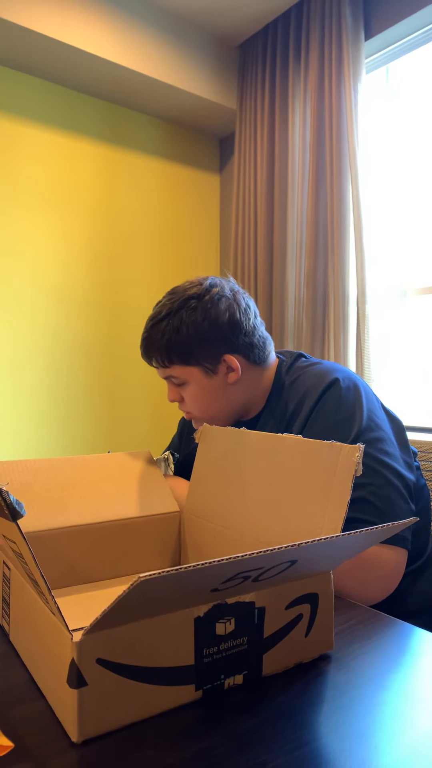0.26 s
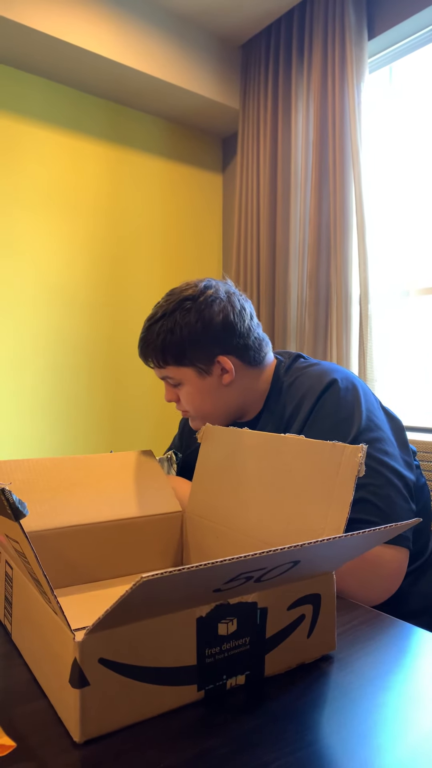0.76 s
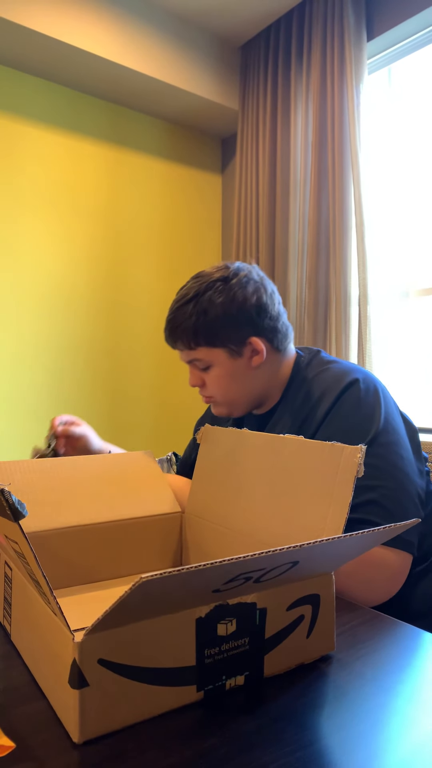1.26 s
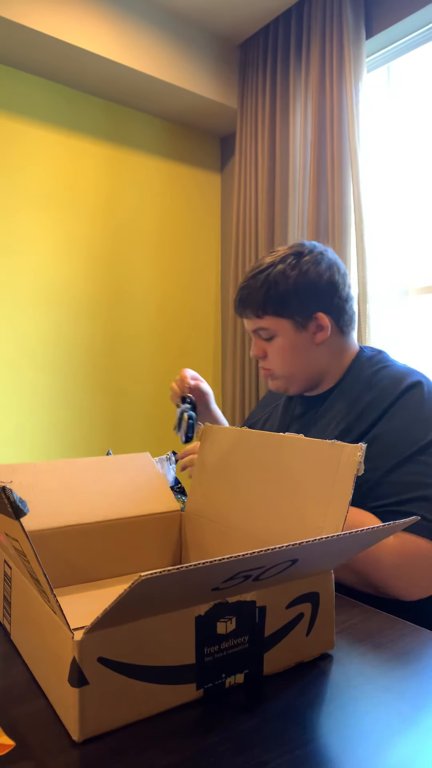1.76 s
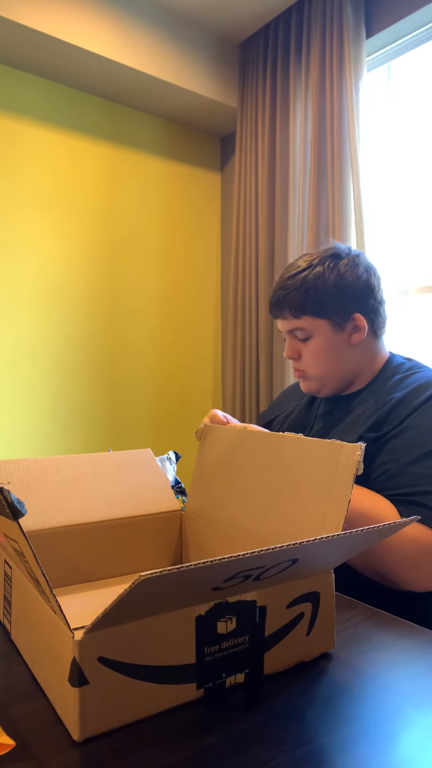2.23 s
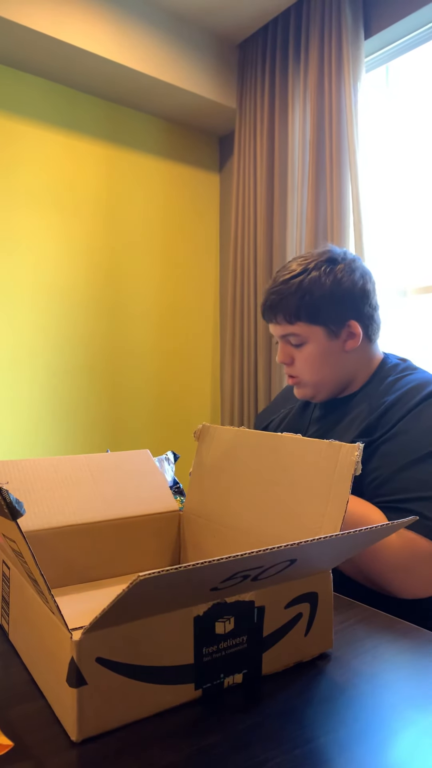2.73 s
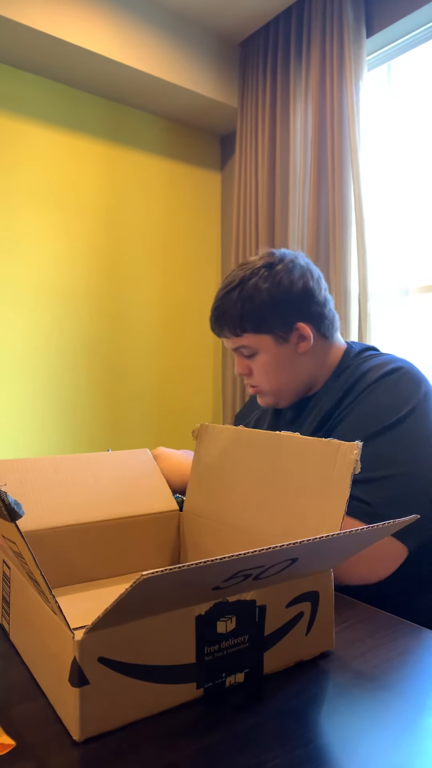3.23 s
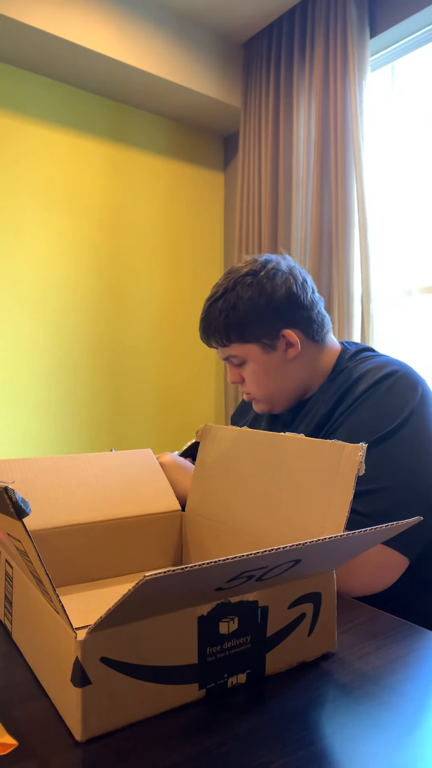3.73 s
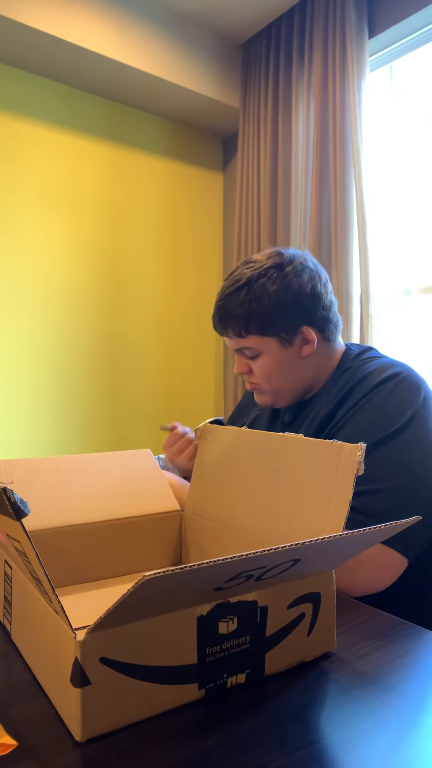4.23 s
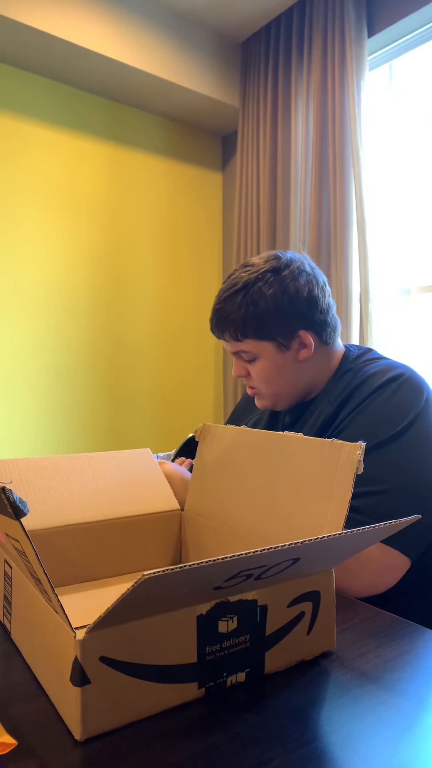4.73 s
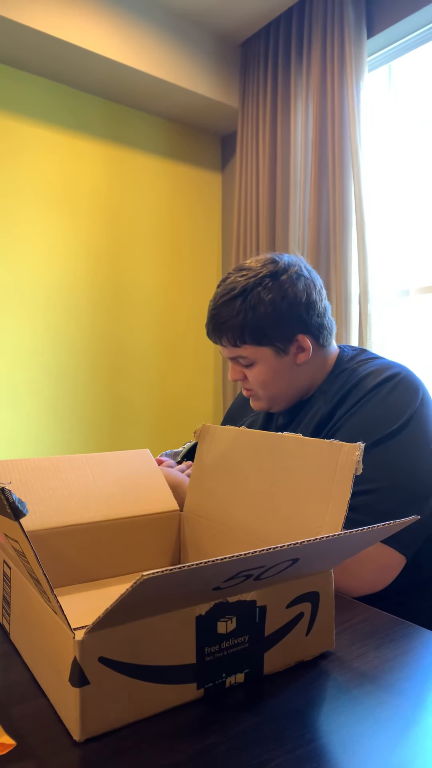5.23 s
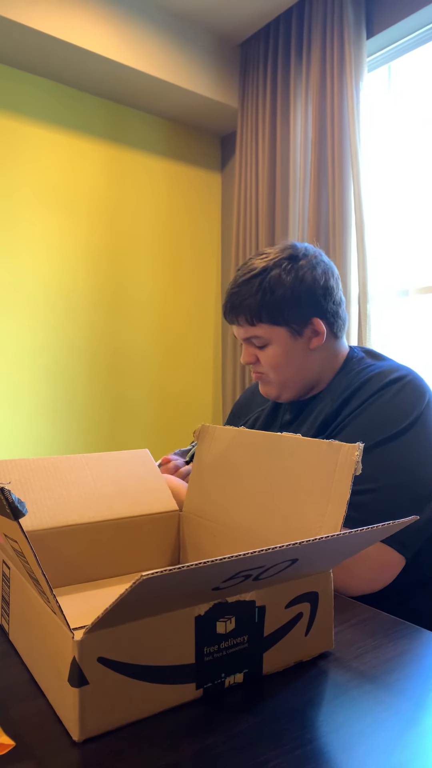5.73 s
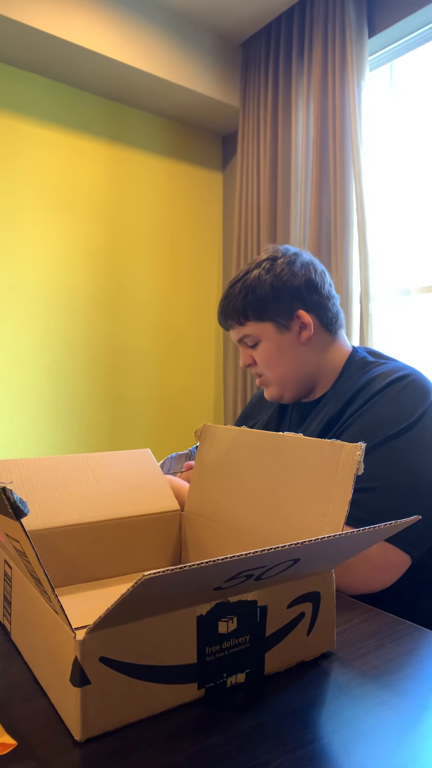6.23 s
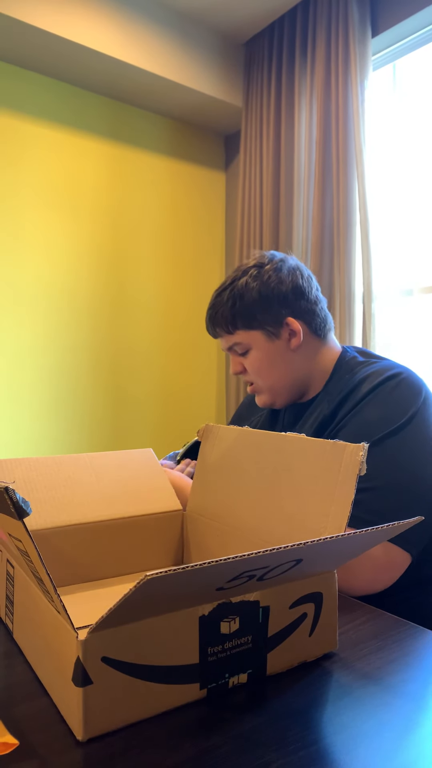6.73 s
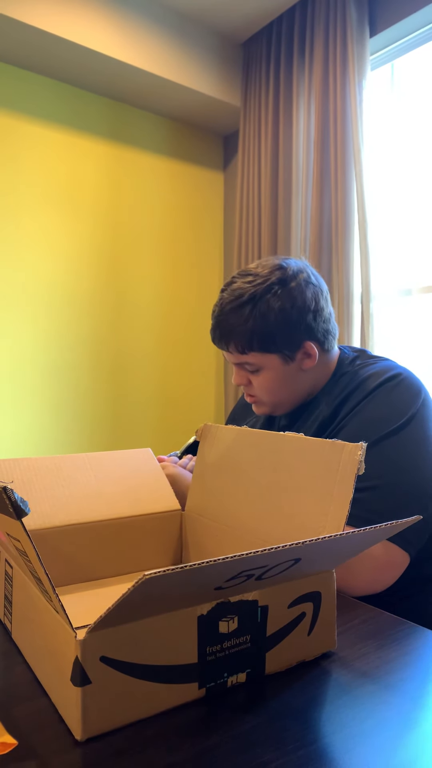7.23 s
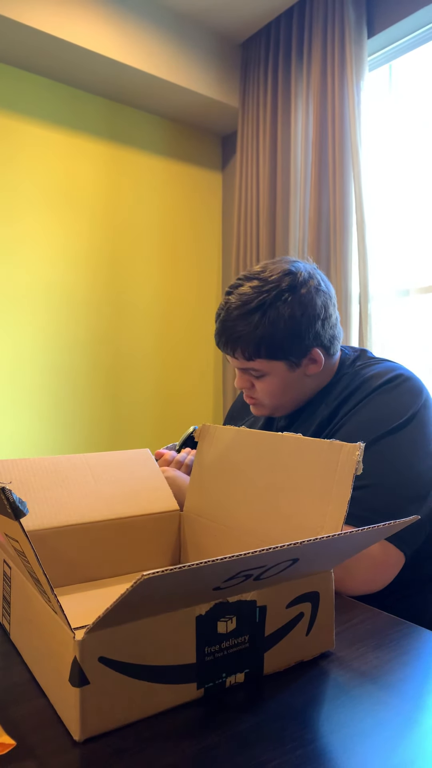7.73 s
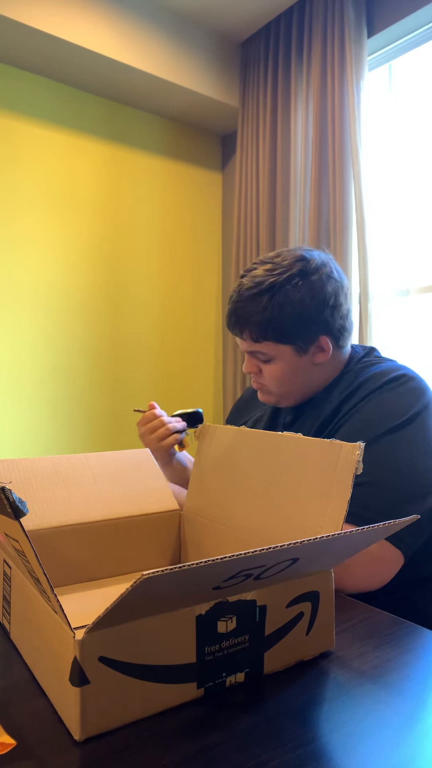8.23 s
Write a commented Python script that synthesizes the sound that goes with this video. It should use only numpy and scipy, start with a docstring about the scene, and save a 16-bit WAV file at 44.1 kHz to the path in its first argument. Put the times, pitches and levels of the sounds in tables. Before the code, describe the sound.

Close on a tabletop in a bare, echoing room, foil bags are gripped and shifted behind a cardboard box. Quiet rustles and tiny snaps come first, with a thin metallic ping and short scrapes. From about four seconds the crinkling grows fuller and solid knocks hit the table, the heaviest near the end. Faint air noise lies underneath.

```python
"""Foil snack bags crinkle as they are gripped and shifted behind a cardboard box on a table.
Many random tiny buckles make the rustle, and single creases snap. Things knock and bump on the tabletop,
and a small metal object scrapes and pings. The room is bare and echoing, with faint air noise.
The microphone stands on the same table, so each knock reaches it first through the board."""
import sys
import numpy as np
from scipy import signal
from scipy.fft import rfft, irfft, next_fast_len
from scipy.io import wavfile
from scipy.ndimage import uniform_filter1d

SR = 44100
rng = np.random.default_rng(int(sys.argv[2]) if len(sys.argv) > 2 else 0)


def to_wav(sig):
    """Store sig (one row per channel, or 1-D mono) as 16-bit WAV at the path in sys.argv[1].

    Samples outside -1..1 are clipped; the rate is SR.
    """
    pcm = np.clip(np.atleast_2d(sig), -1, 1) * 32767
    pcm = np.round(pcm).astype(np.int16)
    wavfile.write(sys.argv[1], SR, pcm.T)  # frames by channels


N = 373525

# All levels in the tables are relative: each source adds its own gain.
# faint air noise, spectrum: pitch_hz, level_db
AIR_SPECTRUM = [(30, -0.5), (130, 0), (300, -8), (1000, -7), (2000, -11), (4000, -6.5), (8000, -23),
                (15000, -49)]
# how long the room echoes: pitch_hz, t60_s (time to fade by 60 dB)
ROOM_ECHO = [(100, 0.87), (400, 0.78), (1500, 1.0), (4000, 0.97), (8000, 0.52), (13000, 0.25)]

# the metal is struck: start_s, level_db
PINGS = [(0.34, -36.5)]
# ways the metal rings: pitch_hz, level_db, t60_s
METAL_MODES = [(6050, -19, 1.1), (7424, -26, .5), (9038, -19, .55), (11262, -6, .4), (11332, -12, .4),
               (13426, -10, .4), (15385, 3, .25)]

# metal dragged over the table: start_s, length_s, drone_db, low_whistle_db, high_whistle_db
DRAGS = [(0.21, 0.19, -49.5, -58, -58), (0.87, 0.31, -45, -62, -64.5), (1.08, .12, -43, -53.5, -46),
         (2.05, 0.025, -71, -72, -60), (2.15, 0.062, -72, -62, -48.5), (2.27, 0.032, -67, -54.5, -62),
         (2.4, 0.14, -79, -66, -88), (2.61, 0.22, -90, -65.5, -82)]
# how fast a drag dies away: drone, low whistle, high whistle (dB per s each)
DRAG_RELEASE = [88, 51, 230]
DRAG_ATTACK_S = 0.025
# resonances that dragging excites: pitch_hz, width_hz, level_db
DRONE_MODES = [(453, 32, 11), (623, 28, -1.5), (767, 58, 2.5), (910, 95, 1)]
# same columns: pitch_hz, width_hz, level_db
LOW_WHISTLE_MODES = [(3175, 79, -1.5), (3400, 140, -4), (3730, 290, -29), (4700, 1900, -16)]
# same columns: pitch_hz, width_hz, level_db
HIGH_WHISTLE_MODES = [(7980, 110, -6), (9480, 130, -6), (12200, 100, 4.5), (13700, 80, -14),
                      (14120, 120, -4)]

# soft bumps on the table: start_s, level_db
BUMPS = [(1.06, -46.5), (1.784, -51), (1.878, -52), (2.412, -56.5), (3.174, -47.5), (3.272, -52),
         (3.382, -46.5), (3.881, -45.5), (4.464, -48.5), (5.313, -39.5), (5.779, -34.5), (6.87, -52),
         (7.864, -33.5), (7.999, -33)]
# boom of a bump, spectrum: pitch_hz, level_db
BUMP_SPECTRUM = [(20, 3), (50, -7.5), (130, 8.5), (200, 3.5), (400, -2), (1500, -82)]

# blows on the table: start_s, level_db, pitch_hz (of the struck thing), crack_db (added to level_db)
KNOCKS = [(0.116, -37.5, 950, -8), (0.740, -29.5, 1340, -7), (1.845, -40, 1616, 1), (2.999, -35, 1500, -19),
          (4.008, -22, 730, -9), (4.043, -15.5, 680, -21), (4.921, -27, 837, -15), (5.308, -14, 1030, -11),
          (5.582, -23, 580, -22), (5.774, -11.5, 710, -11), (6.333, -26.5, 476, -8.5),
          (6.794, -27.5, 473, -13), (7.853, -6.5, 366, -18.5), (7.896, -16.5, 377, -13)]
# body of a blow, spectrum: pitch_hz, level_db
KNOCK_SPECTRUM = [(25, -24), (60, -50), (130, -0.5), (200, -15), (260, 2), (420, 2.5), (650, 3), (1100, 0),
                  (1700, -0.5), (2500, -8), (5000, -15.5), (15000, -25)]
# sharp crack of a blow, spectrum: pitch_hz, level_db
CRACK_SPECTRUM = [(500, -47), (2000, 21), (4000, 18.5), (7500, 10), (9000, -7), (15800, -4)]
KNOCK_RING_DB = 11  # how far the pitch stands out
KNOCK_ROOM_DB, CRACK_ROOM_DB = 7, 7  # echo level against the near sound

# the loudest creases that snap: start_s, level_db, pitch_hz (of the facet), bright_db
SNAPS = [(0.1195, -32, 3340, -32), (0.217, -27.5, 4670, -18), (0.3431, -23, 4140, -3),
         (0.3507, -23.5, 3500, -13.5), (0.7497, -29.5, 2550, -23), (1.091, -38, 3220, 6),
         (1.473, -28.5, 1980, -15), (1.847, -29, 4600, -31.5), (1.96, -30.5, 2210, -38),
         (2.107, -31, 2490, -19), (2.495, -51, 4300, -20), (2.628, -52, 4800, -3),
         (2.821, -30.5, 7350, -16.5), (3.001, -36.5, 2980, -41), (3.356, -27, 6560, -15),
         (3.386, -24, 8300, -7), (3.6393, -31.5, 7200, -11), (3.686, -22, 7900, -15.5),
         (3.8606, -24.5, 4320, -10), (3.8899, -18, 5800, -8.5), (4.0751, -18.5, 1980, -22),
         (5.019, -35, 9000, -11), (5.08, -33, 2560, -21), (5.14, -37, 3300, -13), (5.3928, -21, 2190, -20),
         (5.437, -23, 4490, -15), (5.4587, -19, 2400, -23.5), (5.5853, -21.5, 3900, -21.5),
         (5.8152, -15, 4400, -15), (5.8365, -17, 3400, -4), (6.0877, -25.5, 2110, -7),
         (6.1732, -21, 2660, -28), (6.4058, -26.5, 2200, -15), (6.5298, -25, 5300, -21),
         (6.9395, -27.5, 3350, -17), (7.0107, -32, 2000, -7), (7.1133, -23.5, 3560, -19),
         (7.2126, -25.5, 5450, -1), (7.3019, -21, 2480, -18), (7.4208, -26.5, 4160, -41),
         (7.4691, -27.5, 2050, -29), (7.8113, -25, 4880, -27.5), (7.86, -10, 2420, -12.5),
         (8.055, -21, 2750, -11), (8.2791, -20.5, 2280, -24)]
# sound of a snap, spectrum: pitch_hz, level_db
SNAP_SPECTRUM = [(60, -40), (300, -13.5), (600, -3.5), (1200, -2), (3000, -0.5), (6000, 1.5), (7900, 1.5),
                 (8600, -1.5), (15800, -4.5)]
FACET_RING_DB, SNAP_ROOM_DB = 6, 1  # how far the pitch stands out; echo level against the near sound
GIVE_WAY_S = 0.004  # how quickly slips get smaller away from the main one

# a hand grips and shifts a bag: start_s, length_s, slide_db, crinkle_db, finest_creases_db
GRIPS = [(-0.1, 0.14, -44.5, -47.5, -66), (0.15, .05, -52, -52, -74), (0.2, 0.26, -44, -56, -57),
         (0.67, 0.074, -55, -53, -67), (0.74, 0.1, -45.5, -50, -76), (1.0, 0.35, -44, -46.5, -56),
         (1.46, 0.21, -46, -49.5, -59.5), (1.84, .14, -63, -56.5, -88), (2.09, 0.19, -53, -53, -63.5),
         (2.61, 0.046, -87, -73, -69), (2.88, 0.055, -76, -64, -67), (3.16, 0.2, -52, -53, -68.5),
         (3.35, 0.265, -48, -51.5, -70), (3.62, 0.11, -43.5, -46, -51.5), (3.76, 0.23, -37, -46, -58),
         (4.04, 0.075, -33.5, -37.5, -48), (4.27, .2, -45.5, -46.5, -65), (4.46, 0.072, -35, -36.5, -50.5),
         (4.6, 0.3, -45, -42.5, -58.5), (4.96, 0.11, -48.5, -53, -76), (5.13, 0.21, -48, -50, -73),
         (5.35, 0.15, -39.5, -44, -54), (5.79, .09, -29, -41.5, -50), (5.93, 0.103, -38.5, -41.5, -66),
         (6.15, 0.28, -39.5, -41, -55.5), (6.52, 0.23, -41.5, -44.5, -57.5), (6.74, 0.054, -40.5, -44, -67),
         (6.92, 0.44, -47, -45.5, -57.5), (7.42, .1, -43, -43, -57.5), (7.6, .2, -52.5, -54.5, -72),
         (7.86, .22, -27.5, -29, -41), (8.15, .16, -35, -41.5, -51)]
# how fast a grip dies away: sliding, crinkle, finest creases (dB per s each)
GRIP_RELEASE = [47.2, 51.4, 170]
GRIP_ATTACK_S = 0.03
# bag sliding on the table, spectrum: pitch_hz, level_db
SLIDE_SPECTRUM = [(25, -73), (60, -22.5), (125, -7), (190, -8), (260, -1.5), (370, 2), (520, 0.5),
                  (720, 1.5), (1050, 1), (1600, -4), (2500, -14.5), (5000, -31.5)]
# coarse crinkle of the foil, spectrum: pitch_hz, level_db
CRINKLE_SPECTRUM = [(600, -44), (1400, -4.5), (2300, 2), (4000, 0), (6000, -2.5), (7800, -6.5), (8600, -24),
                    (11000, -33), (16000, -68)]
# finest creases of the foil, spectrum: pitch_hz, level_db
CREASES_SPECTRUM = [(3000, -11), (6500, 0.5), (9000, 1.5), (12000, -4.5), (15800, -6.5)]

TOP_HZ = 15850  # the recorder's band limit


def amp(db):
    """Turn decibels into a gain."""
    return 10 ** (np.asarray(db) / 20)


def unit(x):
    """Scale to an average strength (rms) of 1."""
    return x / np.sqrt(np.mean(x ** 2) + 1e-20)


def along(points, hz):
    """Read values between (Hz, value) points, spaced by pitch on a log axis."""
    point_hz, values = np.transpose(points)
    return np.interp(np.log(hz + 1), np.log(point_hz), values)


def add(track, s, sound):
    """Mix a sound into the track at time s (seconds)."""
    start = int(np.clip(round(s * SR), 0, N - 1))
    track[start:start + len(sound)] += sound[:N - start]


def filtered(x, response):
    """Multiply the spectrum of x by a gain that depends on frequency."""
    padded = next_fast_len(N + 8192)
    hz = np.fft.rfftfreq(padded, 1 / SR)
    return irfft(rfft(x, padded) * response(hz), padded)[:N]


def click(spectrum, tilt_db=0, ring_hz=1000, ring_db=0, ring_octaves=1, size=2048):
    """A pulse of energy 1 with this spectrum, tilted by about tilt_db an octave, plus one resonance."""
    hz = np.fft.rfftfreq(size, 1 / SR)
    ring = ring_db / (1 + (np.log2((hz + 1) / ring_hz) / ring_octaves) ** 2)
    tilt = tilt_db * np.log2(1 + hz / 2000)
    # folding the cepstrum puts all the sound after the start of the pulse
    cepstrum = irfft(np.log(amp(along(spectrum, hz) + tilt + ring)))
    cepstrum[1:size // 2] *= 2
    cepstrum[size // 2 + 1:] = 0
    pulse = irfft(np.exp(rfft(cepstrum)))
    return pulse / np.linalg.norm(pulse)


def coloured(x, spectrum):
    """Give x this spectrum, at rms 1."""
    return unit(signal.fftconvolve(x, click(spectrum))[:N])


def movements(rows, attack_s, release_db_per_s, size=64):
    """Gain curves, one per level column: each movement sets in, holds for its length and dies away."""
    start, length, *levels = np.transpose(rows)[:, :, None]
    t = np.arange(0, N, size) / SR
    rise = np.clip((t - start) / attack_s, 0, 1)
    since_end = np.maximum(t - start - length, 0)
    gains = []
    for db, fall in zip(levels, release_db_per_s):
        shape = rise * amp(db - fall * since_end)
        together = np.linalg.norm(shape, axis=0)  # overlapping movements add in power
        gains.append(np.interp(np.arange(N) / SR, t, together))
    return gains


def room(wet_db, scatter_s, size=512):
    """A path to the microphone: a short scatter off the box, and the room's fading echo."""
    hz = np.fft.rfftfreq(size, 1 / SR)
    frame_s = np.arange(0, 0.7, size / 2 / SR)
    noise = rng.standard_normal((len(hz), len(frame_s), 2)) @ [1, 1j]
    fade = np.exp(-np.log(1000) * frame_s / along(ROOM_ECHO, hz)[:, None])
    tail = signal.istft(noise * fade)[1]
    t = np.arange(SR // 12) / SR
    tail[:len(t)] *= 1 - np.exp(-t / 0.0014)  # the echo takes a moment to build up
    near = rng.standard_normal(len(t)) * t * np.exp(-t / scatter_s)
    path = amp(wet_db) * tail / np.sqrt(np.sum(tail ** 2))
    path[:len(t)] += near / np.sqrt(np.sum(near ** 2))
    return path


def still_air():
    """Steady, faint noise shaped like the still air of the room."""
    return amp(-65.5) * coloured(rng.standard_normal(N), AIR_SPECTRUM)


def pings():
    """Struck metal rings in thin, high modes that build up in the room."""
    out, t = np.zeros(N), np.arange(SR) / SR
    build_up = 1 - np.exp(-t / 0.0041)
    for s, db in PINGS:
        for hz, mode_db, t60 in METAL_MODES:
            phase_drift = np.cumsum(rng.normal(0, 0.03, len(t)))
            fade = amp(db + mode_db - 60 * t / t60)
            tone = np.sin(2 * np.pi * hz * t + phase_drift)
            add(out, s, amp(5.0) * fade * build_up * tone)
    return out


def resonant(modes):
    """Friction noise of rms 1, heard through a set of resonances."""
    def response(f):
        return sum(amp(db) / (1 + ((f - hz) / (width / 2)) ** 2) ** 0.75 for hz, width, db in modes)
    return unit(filtered(rng.standard_normal(N), response))


def scrapes():
    """Dragged metal whistles in its own resonances, and the cardboard it rubs drones hollowly."""
    drone, low, high = movements(DRAGS, DRAG_ATTACK_S, DRAG_RELEASE)
    return (amp(0.5) * drone * resonant(DRONE_MODES)
            + amp(6.0) * low * resonant(LOW_WHISTLE_MODES)
            + high * resonant(HIGH_WHISTLE_MODES))


def bumps():
    """Soft contacts make the table boom quietly."""
    out = np.zeros(N)
    for s, db in BUMPS:
        boom = signal.fftconvolve(click(BUMP_SPECTRUM), room(wet_db=1.5, scatter_s=0.01))
        add(out, s, amp(db + 25.5) * boom)
    return out


def board_wave(travel_s, peak_hz, size=2048):
    """A bending wave of energy 1: high frequencies travel faster, so the pulse falls in pitch."""
    pitch_ratio = np.fft.rfftfreq(size, 1 / SR) / peak_hz
    delay_phase = 4 * np.pi * peak_hz * travel_s * np.sqrt(pitch_ratio)
    wave = irfft(pitch_ratio ** 2 * np.exp(-2 * pitch_ratio - 1j * delay_phase))
    return wave / np.linalg.norm(wave)


def knocks():
    """Each blow runs through the tabletop first, then arrives through the air and fills the room."""
    out = np.zeros(N)
    wave = board_wave(travel_s=0.0062, peak_hz=680)
    for s, db, ring_hz, crack_db in KNOCKS:
        # light taps hardly shake the board
        board_db = db + 15 + min(0, 0.6 * (db + 16))
        add(out, s - 0.0033, amp(board_db) * wave)
        pulse = click(KNOCK_SPECTRUM, 0, ring_hz, KNOCK_RING_DB, ring_octaves=0.43)
        body = signal.fftconvolve(pulse, room(KNOCK_ROOM_DB, scatter_s=0.0047))
        add(out, s + 0.001995, amp(db + 12.0) * body)
        crack = signal.fftconvolve(click(CRACK_SPECTRUM), room(CRACK_ROOM_DB, scatter_s=0.0045))
        add(out, s + 0.003, amp(db + crack_db + 15.0) * crack)
    return out


def cascade(spread_s, count=56):
    """A crease gives way in one main slip, with smaller ones just before and after it."""
    half = SR // 40
    out = np.zeros(2 * half + 1)
    offsets = rng.integers(-half, half, count)
    sizes = np.exp(-np.abs(offsets) / SR / max(spread_s, 1e-4))
    out[half + offsets] = rng.choice([-1, 1], count) * sizes
    out[half] = 1
    return out / np.linalg.norm(out)


def snaps():
    """Single creases flip and ring their facet; the sharper the fold, the brighter the snap."""
    out = np.zeros(N)
    for s, db, ring_hz, bright_db in SNAPS:
        tilt_db = 0.57 * (bright_db + 8.5)
        pulse = click(SNAP_SPECTRUM, tilt_db, ring_hz, FACET_RING_DB, ring_octaves=0.22)
        slips = cascade(GIVE_WAY_S)
        snap = signal.fftconvolve(pulse, slips)
        heard = signal.fftconvolve(snap, room(SNAP_ROOM_DB, scatter_s=0.00037))
        add(out, s - len(slips) / 2 / SR, amp(db + 12.5) * heard)  # main slip lands at s
    return out


def grains(rate, spread_db):
    """Tiny buckles at random moments, in many sizes; their power is the same at any rate (per s)."""
    happens = rng.random(N) < rate / SR
    sizes = amp(spread_db * np.clip(rng.standard_normal(N), -2, 2))
    return happens * rng.choice([-1, 1], N) * sizes / np.sqrt(rate)


def facets(x, patchy_db, size=1024):
    """The foil's resonances shift as its facets bend: random gains, patchy in pitch and time."""
    spectrum = signal.stft(x, nperseg=size)[2]
    over_time = uniform_filter1d(rng.standard_normal(spectrum.shape), size=7, axis=1)
    over_pitch = uniform_filter1d(unit(over_time), size=9, axis=0)
    patches = unit(unit(over_time) + unit(over_pitch))
    return signal.istft(spectrum * amp(patchy_db * patches), nperseg=size)[1][:len(x)]


def rustle(gain, spectrum, rate, spread_db, wet_db, size=32768):
    """A stream of buckles heard in the room; harder handling makes them louder and denser."""
    buckles = grains(rate * np.sqrt(0.089 + unit(gain)), spread_db)
    heard = np.zeros(N)
    # the bag keeps moving, so each stretch takes a new path to the microphone
    for start in range(0, N, size):
        path = room(wet_db, scatter_s=0.00029)
        add(heard, start / SR, signal.fftconvolve(buckles[start:start + size], path))
    return gain * coloured(facets(heard, patchy_db=2.4), spectrum)


def bags():
    """Moving bags slide on the table while their foil buckles in coarse and fine creases."""
    slide, crinkle, creases = movements(GRIPS, GRIP_ATTACK_S, GRIP_RELEASE)
    return (amp(-1.5) * rustle(slide, SLIDE_SPECTRUM, rate=700, spread_db=3.0, wet_db=1.5)
            + amp(-2.5) * rustle(crinkle, CRINKLE_SPECTRUM, rate=300, spread_db=9, wet_db=6.0)
            + amp(5.0) * rustle(creases, CREASES_SPECTRUM, rate=170, spread_db=5, wet_db=3.5))


def scene():
    """All the handling over the still air of the room."""
    return (still_air() + pings() + scrapes() + bumps() + knocks() + snaps() + bags())[None]


def record(dry):
    """The deepest bass is gently cut away; the recorder keeps nothing above its band limit."""
    bass_cut = signal.butter(2, 45, "highpass", fs=SR, output="sos")
    thinned = signal.sosfilt(bass_cut, dry[0])
    return filtered(thinned, lambda hz: 1 / (1 + (hz / TOP_HZ) ** 400))[None]


dry = scene()
out = record(dry)
to_wav(out)
```